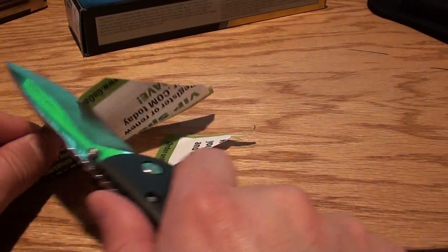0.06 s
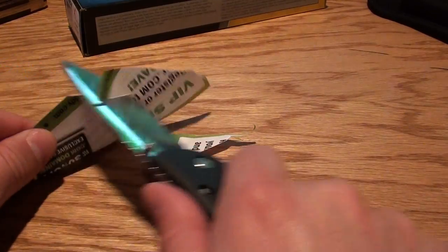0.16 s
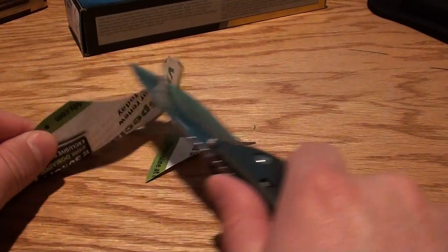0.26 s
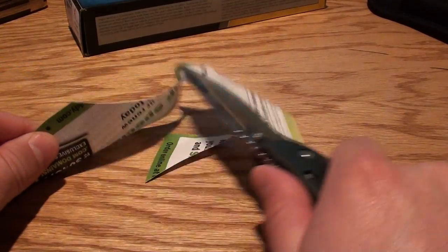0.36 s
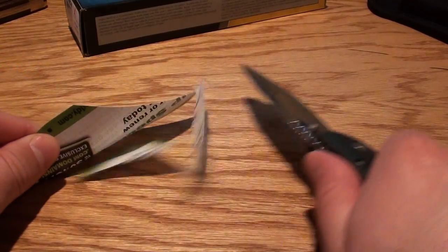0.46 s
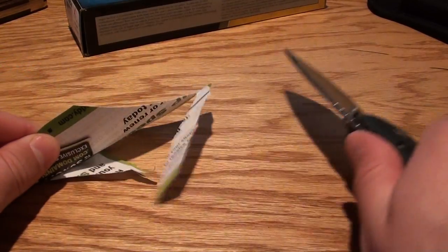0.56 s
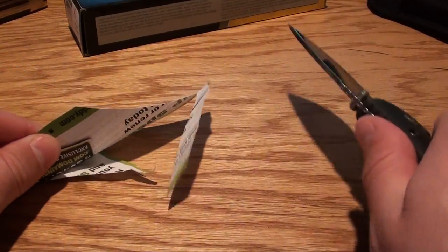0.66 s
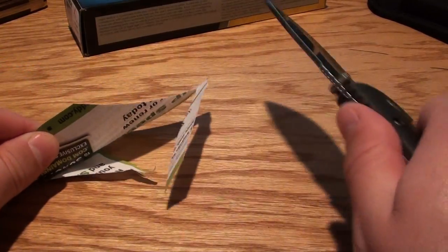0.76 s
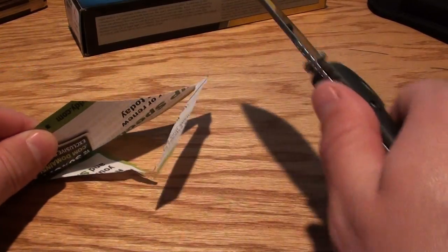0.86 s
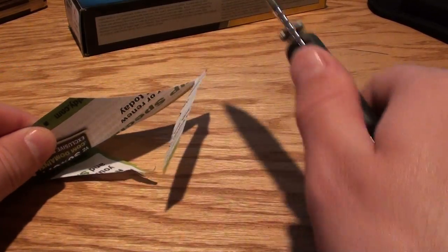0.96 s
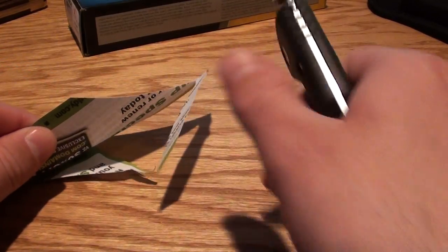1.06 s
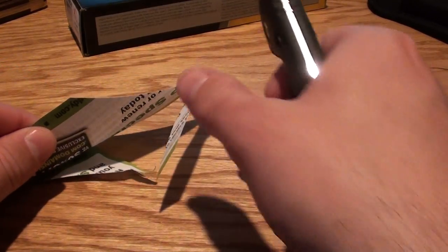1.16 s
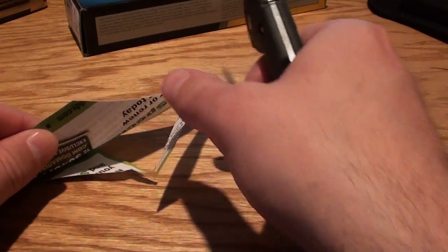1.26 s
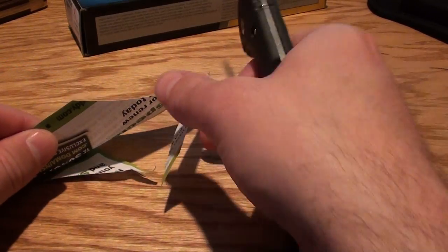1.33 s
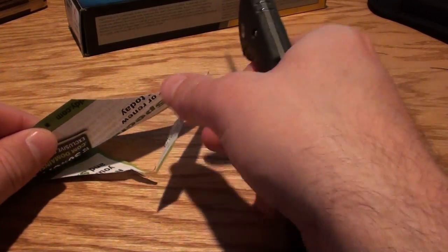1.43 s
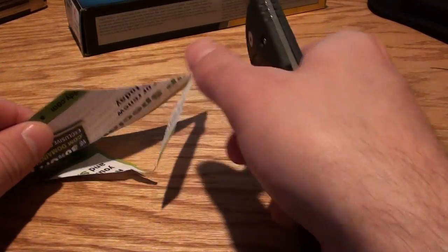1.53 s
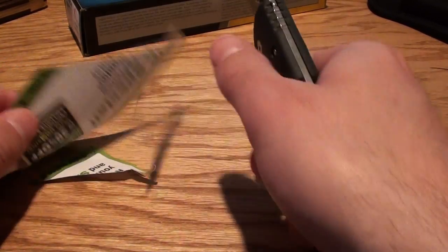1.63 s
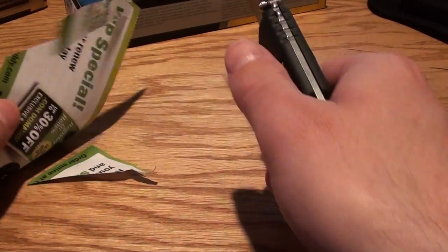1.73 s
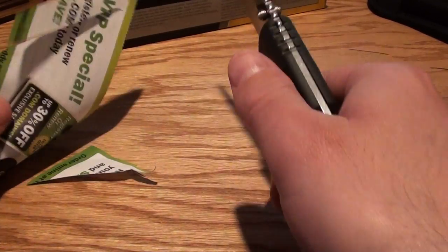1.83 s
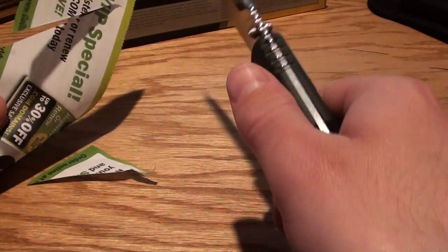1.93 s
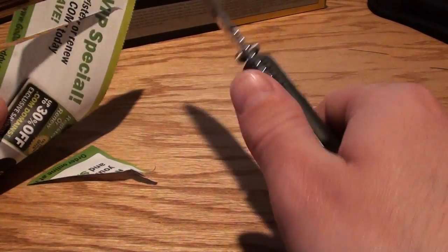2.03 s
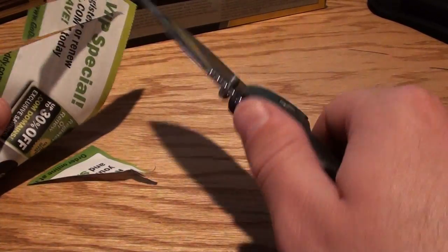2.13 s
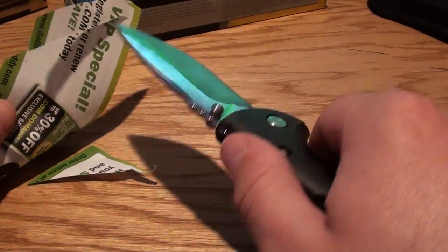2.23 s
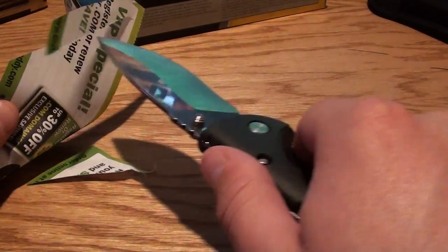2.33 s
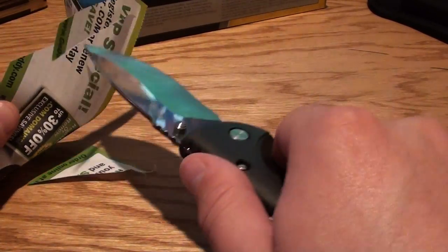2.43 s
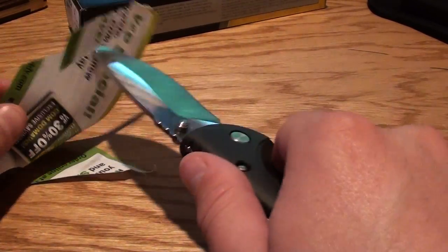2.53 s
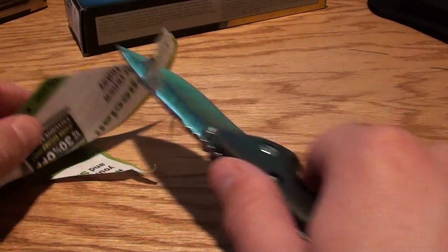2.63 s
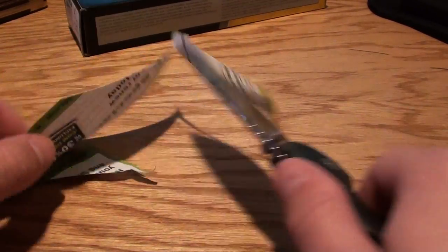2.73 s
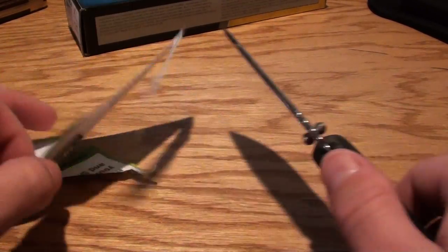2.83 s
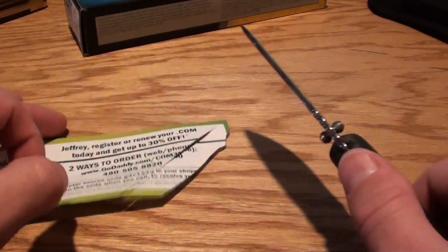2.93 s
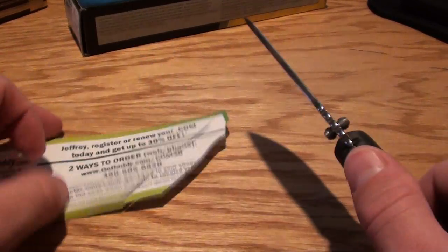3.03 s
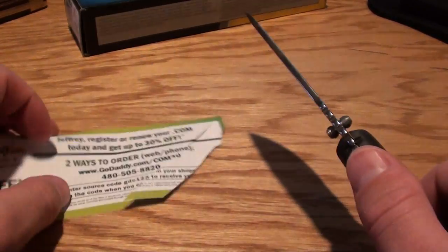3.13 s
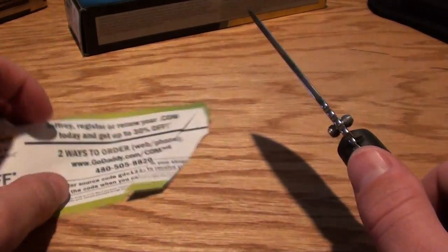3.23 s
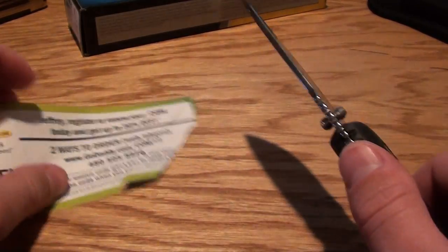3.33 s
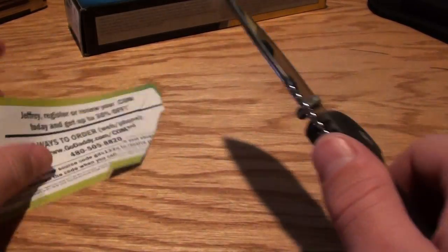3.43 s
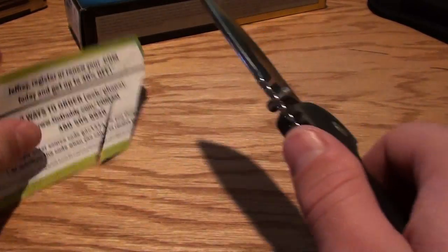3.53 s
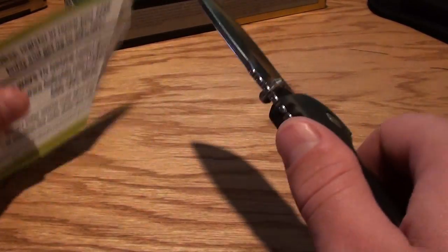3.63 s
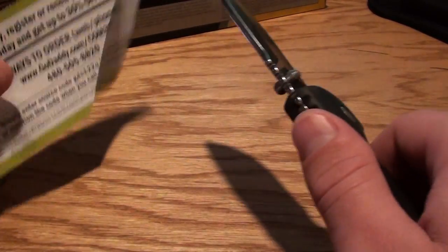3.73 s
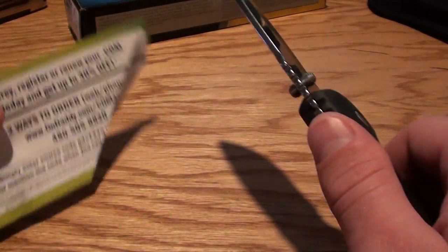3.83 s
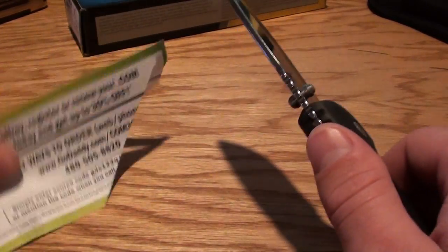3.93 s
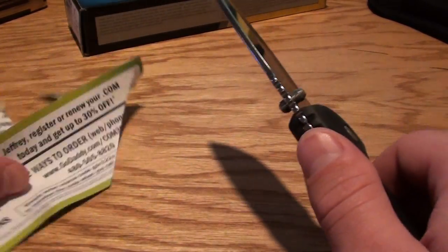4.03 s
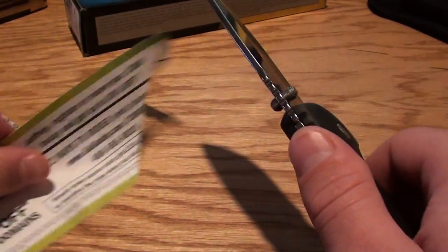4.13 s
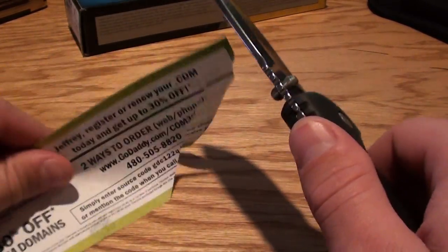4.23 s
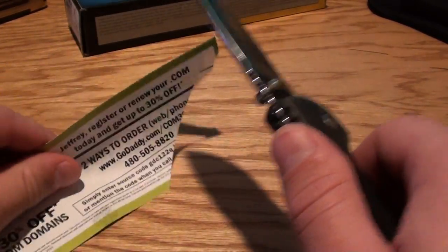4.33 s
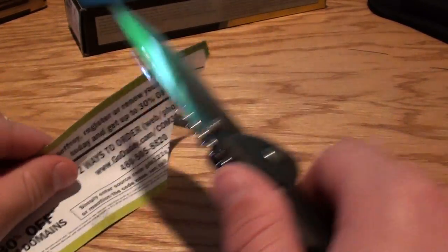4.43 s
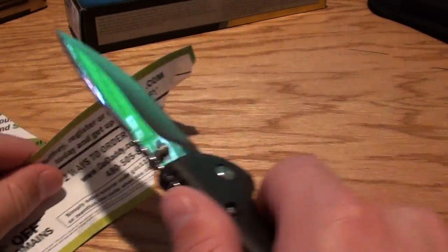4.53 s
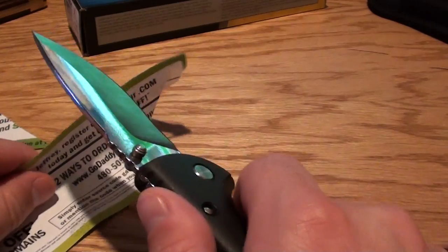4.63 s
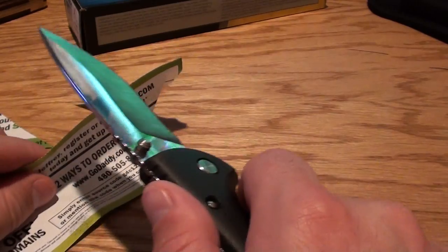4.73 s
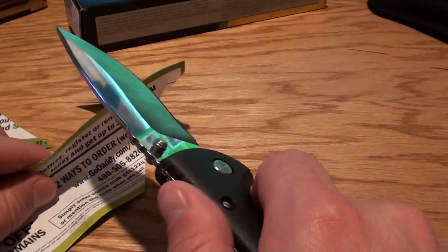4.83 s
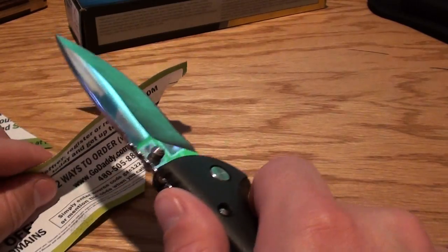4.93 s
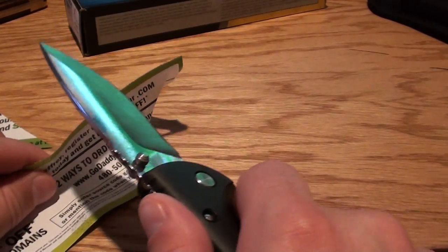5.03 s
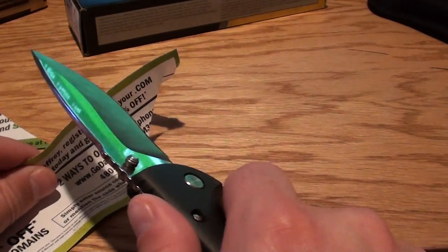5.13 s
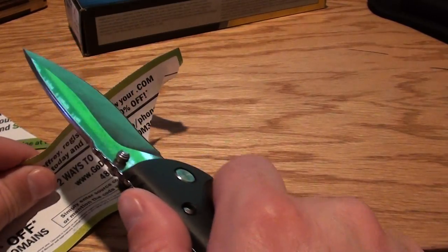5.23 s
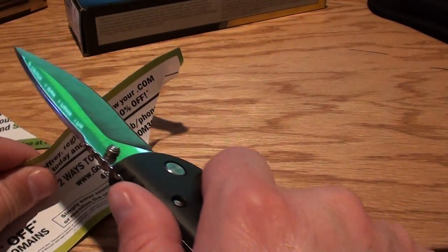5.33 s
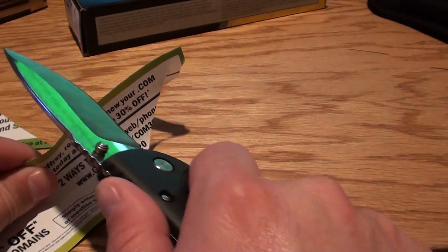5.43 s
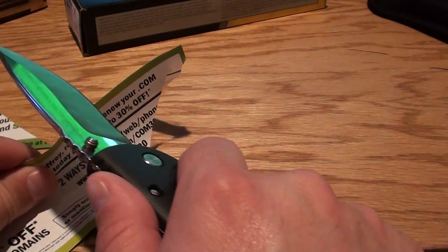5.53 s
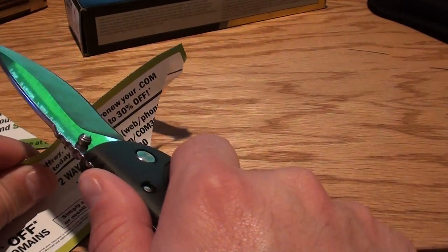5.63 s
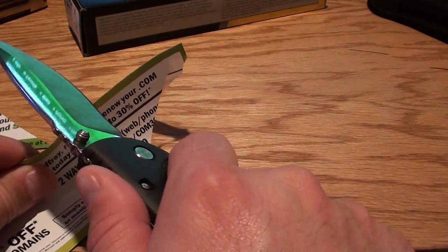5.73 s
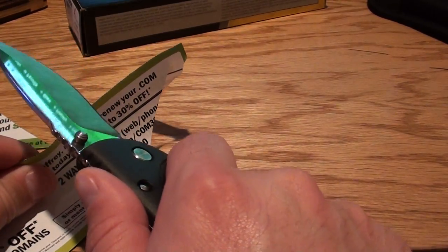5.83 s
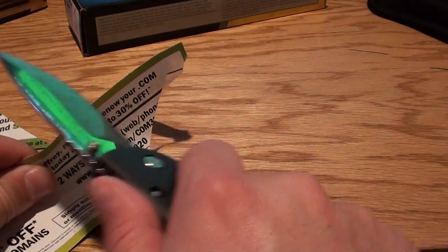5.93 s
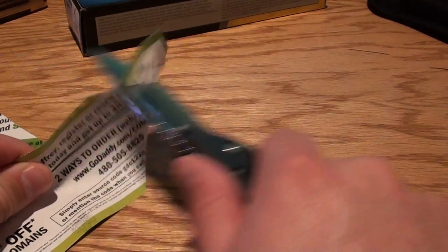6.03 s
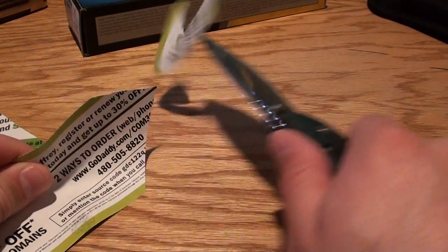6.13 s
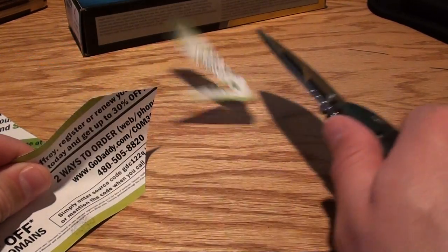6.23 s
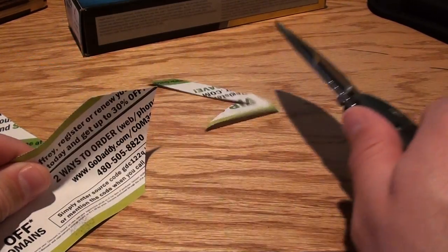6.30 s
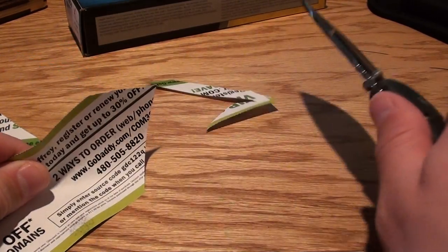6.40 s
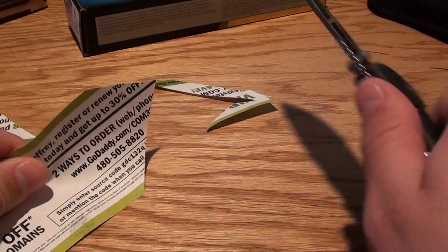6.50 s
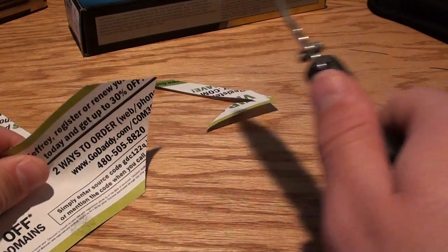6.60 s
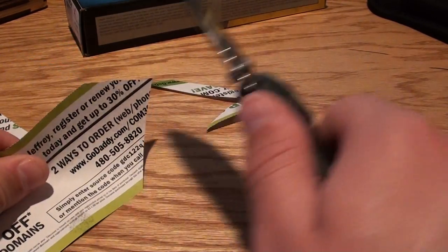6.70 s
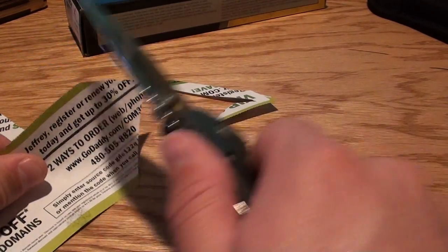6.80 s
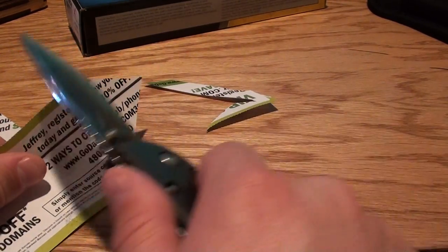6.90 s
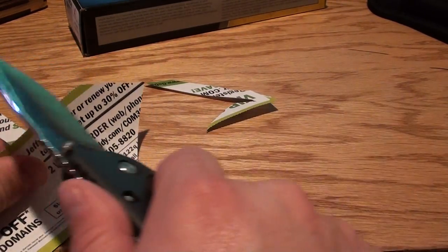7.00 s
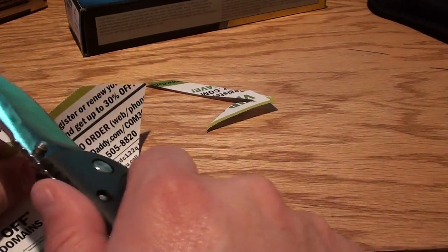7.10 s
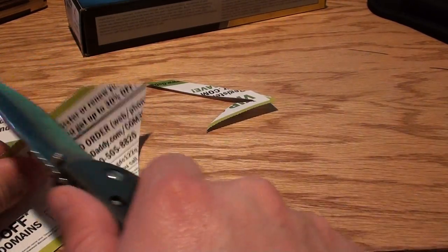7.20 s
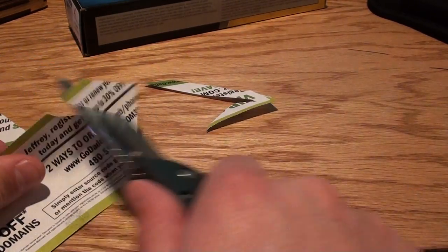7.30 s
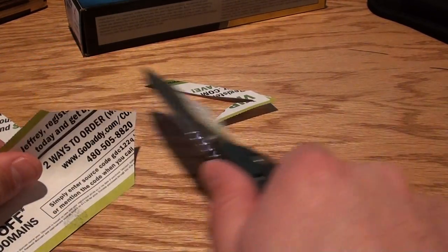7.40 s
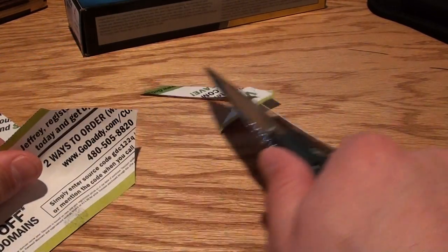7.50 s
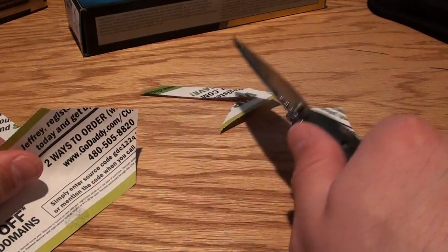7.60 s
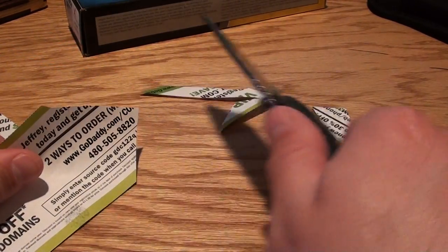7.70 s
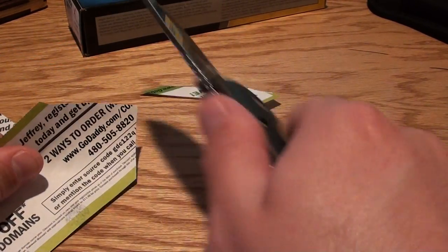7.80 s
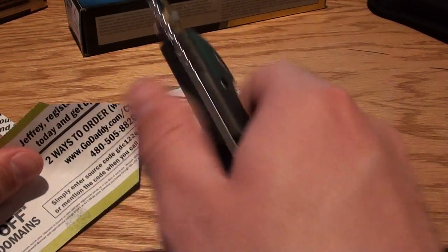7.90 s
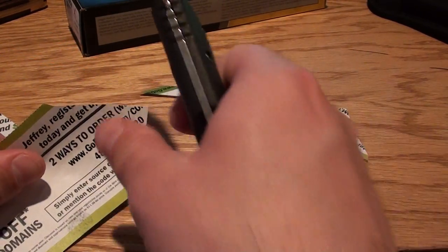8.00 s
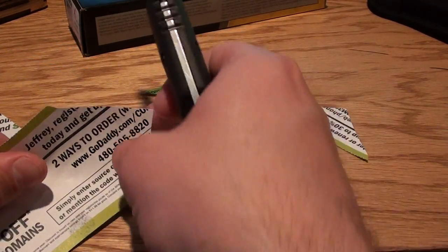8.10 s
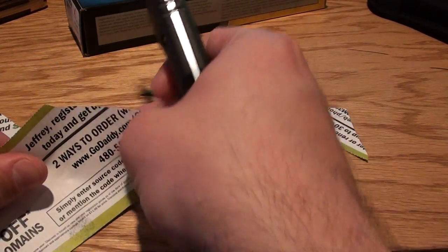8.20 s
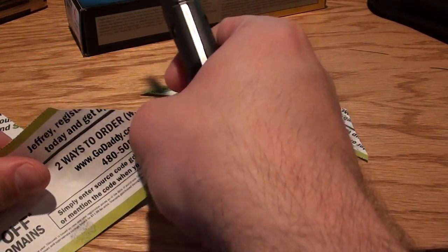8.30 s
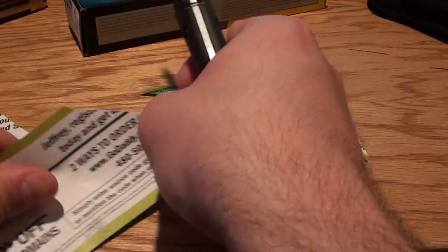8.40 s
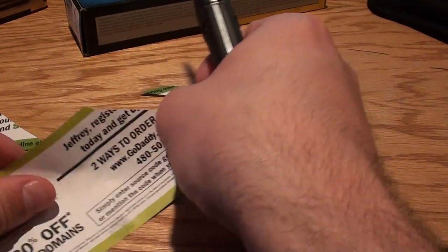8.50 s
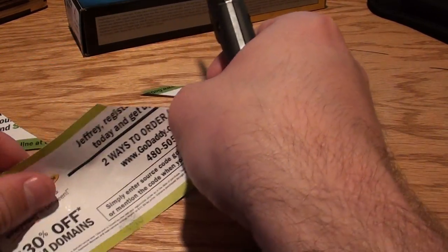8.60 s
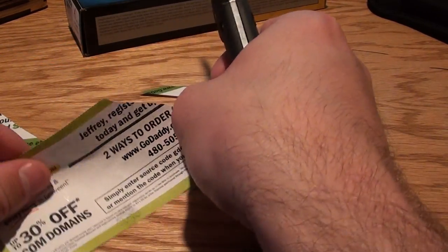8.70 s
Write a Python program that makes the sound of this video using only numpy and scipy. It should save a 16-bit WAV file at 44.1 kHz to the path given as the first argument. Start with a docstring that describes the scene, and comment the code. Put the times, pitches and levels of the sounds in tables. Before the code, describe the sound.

Close to the microphone in a quiet small room, a blade rasps through stiff glossy paper. Fingers turn the card over, making it crackle, tick and scrape across a wooden tabletop for several seconds. The knife then makes two quick, zipping slices about a second apart, and a hand thumps the table softly amid a last rustle. Low hum, hiss and a very faint high whistle lie underneath.

```python
"""A bright tearing rasp: a sharp blade slices a glossy card, the first of three quick cuts in a small room.
The edge parts thousands of fibres a second, and the sheet colours their clicks. Between cuts the card
slides with stick-slip friction, its creases snap in the fingers and ring its resonances, and a hand bumps
the wooden table, exciting its low modes. Behind it all lie a soft room hum and hiss and the thin,
throbbing whistle of a picture tube."""
import sys
import numpy as np
from scipy import signal
from scipy.fft import rfft, irfft, next_fast_len
from scipy.io import wavfile
from scipy.ndimage import uniform_filter1d

SR = 44100
rng = np.random.default_rng(int(sys.argv[2]) if len(sys.argv) > 2 else 0)


def master(y):
    """Save y as 16-bit WAV."""
    cut = np.clip(np.atleast_2d(y).T, -1, 1)
    pcm = np.round(cut * 32767)  # scale
    wavfile.write(sys.argv[1], SR, pcm.astype(np.int16))


N = 385875
T = np.arange(N) / SR


def from_db(db):
    """Amplitude ratio of a level in decibels."""
    return 10 ** (np.asarray(db) / 20)


def unit_rms(x):
    """Normalisation to unit power."""
    return x / np.sqrt(np.mean(x ** 2) + 1e-20)


def level_at(spectrum, hz):
    """Interpolation of (f/Hz, level/dB) points on a logarithmic frequency axis."""
    freqs, levels = np.transpose(spectrum)
    return np.interp(np.log(hz), np.log(freqs), levels)


def drift(corner_hz):
    """Slow random fluctuation of unit rms: noise through two one-pole low-passes."""
    r = np.exp(-2 * np.pi * corner_hz * 20 / SR)   # one value per 20 samples
    slow = signal.lfilter([1], [1, -2 * r, r * r], rng.standard_normal(N // 20 + 2002))[2000:]
    return np.interp(np.arange(N) / 20, np.arange(len(slow)), unit_rms(slow))


def band(x, low_hz, high_hz):
    """Butterworth band-pass."""
    return signal.sosfilt(signal.butter(2, [low_hz, high_hz], "band", fs=SR, output="sos"), x)


def resonance(x, hz, width_hz):
    """Damped two-pole resonator with unit peak gain."""
    r, w = np.exp(-np.pi * width_hz / SR), 2 * np.pi * hz / SR
    return signal.lfilter(np.array([1, 0, -1]) * (1 - r * r) / 2, [1, -2 * r * np.cos(w), r * r], x)


def reverberation(x, t60_s=0.17, wall_cut_hz=18000):
    """Repeated reflection: eight feedback delays a side, with wall absorption dulling every round."""
    size = next_fast_len(N + SR)
    hz = np.arange(size // 2 + 1) * SR / size
    wall_gain = (1 + (hz / wall_cut_hz) ** 2) ** -0.115
    response = np.zeros((2, len(hz)), complex)
    for k, lag_s in enumerate(rng.uniform(.008, .024, 16)):
        delay = np.exp(-2j * np.pi * hz * round(lag_s * SR) / SR)
        loop = from_db(-60 * lag_s / t60_s) * wall_gain * delay
        response[k % 2] += (-1) ** (k // 2) * loop / (1 - loop)
    return irfft(response * rfft(x, size), size)[:, :N]


# Hiss spectrum common to both channels: f/Hz, relative level/dB
HISS_MID = [(30, -7), (60, -10), (100, -19), (160, -8), (250, -6), (330, -8.5), (480, -12), (900, -7.5),
            (1300, -13.5), (1650, -18), (4000, -19.5), (14500, -26.5)]
# Hiss in antiphase between the channels: f/Hz, level/dB re mid
HISS_SIDE = [(60, -19), (180, -15), (550, -6.5), (1650, -5), (4970, -8), (15000, -23)]
# Hum lines: f/Hz, level/dB
HUM_LINES = [(120, -68), (199.2, -65), (349, -63.5)]
# Swells of the rumble: t/s, half width/s, gain/dB
RUMBLE_SWELLS = [(4.4, 0.79, 11), (8.3, 0.32, 8)]


def room_noise(hiss_db=-51, rumble_db=-72):
    """Filtered noise: partly coherent hiss of room and microphone, narrow-band hum and a low rumble."""
    edges_hz, hiss = np.geomspace(25, 17000, 25), 0
    white = rng.standard_normal((2, 2, N))
    for k, (low, high) in enumerate(zip(edges_hz, edges_hz[1:])):
        hz = np.sqrt(low * high)
        mid, side = band(white[k % 2], low, high)
        side = from_db(level_at(HISS_SIDE, hz)) * side * [[1], [-1]]
        hiss += from_db(level_at(HISS_MID, hz)) * (mid + side)
    rumble_noise, hum_noise = white[:, 1, ::-1]   # time reversal decorrelates them from the hiss
    hum = sum(from_db(db) * unit_rms(resonance(resonance(hum_noise, hz, 9), hz, 9))
              for hz, db in HUM_LINES)
    swell_db = sum(db * np.exp(-((T - s) / width) ** 2) for s, width, db in RUMBLE_SWELLS)
    rumble = from_db(rumble_db + swell_db) * unit_rms(band(rumble_noise, 41, 89))
    return from_db(hiss_db) * unit_rms(hiss) + hum + rumble


def tube_whistle(scan_hz=15734.5, level_db=-61, throb_hz=12.81, throb_depth=.6):
    """Amplitude modulation: a thin, throbbing picture-tube whistle, heard at a slowly drifting level."""
    throb = 1 + throb_depth * np.sin(2 * np.pi * throb_hz * T)
    amplitude = np.sqrt(2) * from_db(level_db + 1.5 * drift(0.97))
    return amplitude * throb * np.sin(2 * np.pi * scan_hz * T)


# Impacts of hand and card on the table: t/s, impulse level/dB
TABLE_IMPACTS = [(1.392, -30), (3.085, -36), (3.296, -41), (3.951, -48), (4.392, -46), (7.355, -41),
                 (8.12, -24), (8.247, -33), (8.331, -37)]
# Modes of the table top: f/Hz, gain/dB, T60/s
WOOD_MODES = [(68.8, -9.5, 0.43), (112, -9, 0.24), (136.4, -2, 0.17), (297, 3.5, 0.088), (400, -13, 0.044)]


def table_bumps(weight_lag_s=0.00592):
    """Impact excitation: a light touch, then the soft weight of the hand, rings the table's modes."""
    impulses = np.full(N, 1e-18)
    for s, db in TABLE_IMPACTS:
        impulses[round(s * SR)] = from_db(db)
    touch = 0.61 * band(impulses, 405, 900)
    weight = band(np.roll(impulses, round(weight_lag_s * SR)), 74, 228)
    wood = 0
    for hz, db, t60 in WOOD_MODES:
        r, w = from_db(-60 / (t60 * SR)), 2 * np.pi * hz / SR
        ring = signal.lfilter([0, np.sin(w)], [1, -2 * r * np.cos(w), r * r], touch + weight)
        wood += from_db(db) * ring
    return wood


def envelopes(gestures):
    """Linear interpolation of rows (t/s, level/dB, ...): amplitude, zero if idle, then the other columns."""
    columns = np.zeros((len(gestures[0][0]) - 1, N))
    columns[0] = -120   # effectively silent between gestures
    columns[1:] = np.array(gestures[0][0][2:])[:, None]
    for times, *values in map(np.transpose, gestures):
        span = slice(*np.searchsorted(T, [times[0], times[-1]]))
        columns[:, span] = [np.interp(T[span], times, v) for v in values]
    return from_db(columns[0]), *columns[1:]


def fibre_clicks(per_s, spread_db):
    """Shot noise: two independent Poisson trains of clicks of uneven size."""
    sizes = from_db(spread_db * np.minimum(rng.exponential(1, (2, N)), 5))
    signs = rng.choice([-1, 1], (2, N))
    return unit_rms(sizes * signs * (rng.random((2, N)) < per_s / SR))


def sheet_noise(clicks, spectrum, flap_db, fizz_db, grip_db, patch_db,
                flap_hump_db=0, flap_hz=2000, ring_db=0, ring_hz=7500):
    """Source-filter model: the sheet colours clicks in bands that vary singly (patch) and jointly (grip)."""
    edges_hz, grip = np.geomspace(90, 17000, 46), drift(110)
    parts, powers = np.zeros((2, 3, N))
    for k, (low, high) in enumerate(zip(edges_hz, edges_hz[1:])):
        hz = np.sqrt(low * high)
        part = int(hz > 3200) + int(hz > 10500)   # low flap, central core or high fizz
        octaves = np.log2(hz / flap_hz)
        flap_peak = flap_hump_db * np.exp(-(octaves / 0.28) ** 2)
        ring_peak = ring_db * np.exp(-(np.log2(hz / ring_hz) / 0.37) ** 2)
        bass_loss = flap_hump_db * np.minimum(0, octaves + 1.4)   # a small taut flap carries little bass
        gain = from_db(level_at(spectrum, hz) + flap_peak + ring_peak + bass_loss)
        parts[part] += gain * from_db(patch_db * drift(9.9)) * band(clicks[k % 2], low, high)
        powers[part] += gain ** 2 * (high - low) / (SR / 2)
    flap, core, fizz = parts / np.sqrt(powers)
    return from_db(grip_db * grip) * (from_db(flap_db) * flap + core + from_db(fizz_db) * fizz)


# Card sliding on wood, skin and blade, one list a move: t/s, level/dB, flap level/dB re core
SLIDE_MOVES = [
    [(2.49, -58, 0), (2.55, -42.5, -2.5), (2.672, -40, -14.5), (2.685, -53, -4), (2.76, -38.5, -10.5),
     (2.915, -44, -2.5), (2.93, -51, -5), (3.0, -54, -6)],
    [(3.13, -60, -6), (3.2, -43, 4), (3.25, -42, -4), (3.36, -37.5, -6), (3.4, -29, -9), (3.45, -39, -7),
     (3.5, -32.5, -5.5), (3.65, -33.5, -4.5), (3.775, -41.5, -3.5), (3.79, -33.5, 7.5), (3.876, -48, -11)],
    [(3.89, -57, -15), (3.925, -33.5, 2), (3.962, -35, -2), (4.0, -29.5, 3.5), (4.06, -31.5, -12.5),
     (4.25, -30, -5.5), (4.27, -64, -1)],
    [(4.272, -31.5, 2), (4.365, -29, -10.5), (4.41, -37.5, -3), (4.68, -40, -5), (4.695, -29.5, -13),
     (4.76, -42, -6), (4.856, -61, 5)],
    [(4.9, -61, 1), (5.09, -56, -3), (5.1, -42, -5), (5.2, -55, -3), (5.3, -64.5, -5), (5.5, -63, -2),
     (5.52, -55, -8), (5.66, -62, -6)],
    [(6.64, -56.5, 3), (6.79, -52.5, 3), (6.9, -43, 1)],
    [(7.86, -62, 2), (7.95, -53.5, 4), (8.02, -58, 3), (8.04, -66, 2), (8.14, -54, 5.5)],
    [(8.223, -49, 1), (8.365, -56, 2.5), (8.375, -43.5, -1.5), (8.425, -44, 0), (8.435, -34, -13),
     (8.535, -36.5, -8), (8.565, -49, -1), (8.575, -40, 0), (8.75, -39, -5)],
]
# Short separate scrapes: t/s, duration/s, level/dB, flap level/dB re core
SHORT_SCRAPES = [(0.05, .02, -48.5, -1), (0.459, 0.016, -30, -8), (.525, 0.015, -27.5, -14),
                 (0.668, .017, -38, -12), (.752, 0.13, -49, -2), (1.553, 0.12, -53, -0.5),
                 (1.667, 0.11, -35.5, -8.5), (1.819, 0.036, -42.5, -7), (1.865, 0.0037, -38.5, 0),
                 (1.878, 0.0061, -40, -1), (2.554, 0.024, -26, -12.5), (2.76, 0.033, -26, -12),
                 (3.055, 0.057, -44.5, -11), (5.218, 0.034, -44.5, -9), (5.445, 0.021, -48.5, 1),
                 (6.723, 0.012, -36, -23), (6.771, 0.008, -34, -17), (7.47, 0.071, -49, -3),
                 (8.197, 0.021, -34.5, 7), (8.498, 0.023, -28, -1.5)]
# Friction spectrum: f/Hz, relative level/dB
FRICTION_SPECTRUM = [(120, -16), (200, -9), (569, -14), (851, -8), (1100, -12), (1250, -9.5), (2250, -6),
                     (2560, -12), (2910, -7.5), (7410, -2), (13100, -20.5), (16000, -41)]


def card_slides(scrape_fade_db=-7, settle_s=0.0046):
    """Stick-slip friction: glossy paper grips and slips on the grain; moves start fast, settle slower."""
    slide, slide_flap_db = envelopes(SLIDE_MOVES)
    scrape, scrape_flap_db = envelopes([[(s, db, flap), (s + length, db + scrape_fade_db, flap)]
                                        for s, length, db, flap in SHORT_SCRAPES])
    level = np.maximum(slide, scrape)
    fade = np.exp(-1 / (settle_s * SR))
    settling = signal.lfilter([1 - fade], [1, -fade], level)
    level = np.maximum(uniform_filter1d(level, size=150), settling)
    flap_db = uniform_filter1d(np.where(scrape > slide, scrape_flap_db, slide_flap_db), size=900)
    slips = fibre_clicks(per_s=6000, spread_db=3.5)
    crackles = .25 * fibre_clicks(per_s=150, spread_db=3)[0]
    return level * sheet_noise(slips + crackles, FRICTION_SPECTRUM, flap_db,
                               fizz_db=-17.5, grip_db=1, patch_db=3.1)


# Creases snapping and edges ticking: t/s, drive level/dB, body level/dB re edge
CREASE_SNAPS = [(.524, -19, -29), (.668, -19, -22), (1.047, -39.5, 0), (1.5614, -32, -8),
                (1.6662, -26.5, 7.5), (1.8217, -30, -17), (2.11, -34, -12), (2.139, -36.5, -12),
                (2.244, -36, -9), (2.2648, -36, -9), (2.2977, -35.5, -6), (2.358, -34, -3),
                (2.4085, -23, -15), (2.4414, -18.5, -10.5), (2.4738, -19, -8), (2.5007, -23.5, -3.5),
                (2.5745, -23, -6), (2.8998, -21, -16), (2.9437, -33, -18), (2.9527, -19, -21),
                (3.1927, -10, -10), (3.224, -27.5, -6), (3.3108, -27, -0.5), (3.3486, -18.5, -8.5),
                (3.495, -0.5, -5), (3.5563, -13.5, -8), (3.6436, -25, 0.5), (3.6583, -5.5, -7),
                (3.725, -19.5, 4), (3.741, -20, -7), (3.7839, -8, -6.5), (3.895, -23, -9),
                (3.9978, -0.5, -18), (4.0112, -12, -17), (4.2777, -28, 0), (4.2897, -6.5, -12.5),
                (4.3231, -13.5, -6.5), (4.348, -4.5, -16.5), (4.3607, -6.5, -29), (4.3957, -21, -27),
                (4.4028, -18.5, 1), (4.5978, -18, -19), (4.6845, -20.5, -7), (4.7654, -8, -13.5),
                (4.9682, -31.5, -20), (5.102, -35, -17), (5.1346, -22, -14), (5.1738, -22, -17),
                (6.313, -36, -15), (6.671, -26, -6.5), (6.7218, -18.5, -19), (6.773, -29, -16),
                (6.807, -17.5, -12), (6.8275, -21.5, -10), (6.8872, -21.5, -7.5), (7.2415, -17.5, -4),
                (7.478, -35, -19), (7.489, -19.5, -12), (7.7983, -26.5, -19), (7.836, -39, 0),
                (7.9192, -30.5, -7), (8.1883, -12, -5), (8.2644, -25.5, -11), (8.312, -28.5, -4),
                (8.3493, -29.5, -7), (8.4282, -18.5, -2.5), (8.5683, -18.5, 7.5)]
# Resonances of the card's low body, mid body and edge: f/Hz, bandwidth/Hz, gain/dB
LOW_MODES = [(257, 100, 5.4), (710, 150, 18.4)]
MID_MODES = [(1200, 1530, 8.8), (2010, 1440, 11.84)]
EDGE_MODES = [(4070, 1280, -1.5), (5120, 1500, 0), (8400, 1300, -2.5), (10500, 5700, -32)]


def card_snaps(crackle_s=.003, low_body_db=-9):
    """Transient excitation: a click and brief crackle drive each card resonance with random strength."""
    modes, size = LOW_MODES + MID_MODES + EDGE_MODES, 800
    counts = [len(LOW_MODES), len(MID_MODES), len(EDGE_MODES)]
    scatters_db = rng.normal(0, 1.5, (len(CREASE_SNAPS), len(modes)))
    bursts = rng.standard_normal((len(CREASE_SNAPS), size))
    bursts[:, 0] += 4   # the opening click
    decay_s = crackle_s * np.repeat([2, 1, 1], counts)   # the low body is driven twice as long
    decay = np.exp(-(T[:size] / decay_s[:, None]) ** 1.5)
    drive = np.full((len(modes), N + size), 1e-18)
    for (s, db, body_db), scatter_db, burst in zip(CREASE_SNAPS, scatters_db, bursts):
        start = round(s * SR)
        share_db = np.repeat([body_db + low_body_db, body_db, 0], counts)
        drive[:, start:start + size] += from_db(db + share_db + scatter_db)[:, None] * burst * decay
    ringing = sum((-1) ** k * from_db(db) * resonance(drive[k, :N], hz, width)
                  for k, (hz, width, db) in enumerate(modes))
    return band(ringing, 78, 18000)


def cut_shape(start, end, db, bite_s, first_db, taut_db, first_hz, taut_hz, ring_first_hz, ring_last_hz):
    """Attack, sustain and decay of a cut, as rows of t/s, level/dB, flap level/dB, flap f/Hz, ring f/Hz."""
    taut_share, last_db = 0.35, -8.5   # share of the cut before the flap is taut; final flap level
    taut_s = start + max(taut_share * (end - start), bite_s + .002)
    ring_taut_hz = ring_first_hz + 2 * taut_share * (ring_last_hz - ring_first_hz)
    return [(start, db - 22, first_db, first_hz, ring_first_hz),   # first touch
            (start + bite_s / 3, db - 8, first_db, first_hz, ring_first_hz),
            (start + bite_s, db, (first_db + taut_db) / 2, first_hz, ring_first_hz),   # full bite
            (taut_s, db, taut_db, taut_hz, ring_taut_hz),
            (end, db, last_db, taut_hz, ring_last_hz),
            (end + 0.0036, db - 13.5, last_db, taut_hz, ring_last_hz),   # the blade leaves
            (end + 0.17, db - 51, last_db, taut_hz, 5900)]   # the cut dies away in the small room


def blade_catches(until_s, start_s=.371, gap_s=.008, length_s=.0016):
    """Intermittent sticking: late in the first cut the blade catches, ever slower, longer and deeper."""
    gain, s = np.ones(N), start_s
    for k in range(8):
        gain[(T > s) & (T < s + length_s * 1.24 ** k)] *= from_db(-5 - 1.2 * k)
        gain[(T > s) & (T < until_s)] *= from_db(-.3)   # each catch leaves the tearing weaker
        s += gap_s * 1.074 ** k
    return gain


# Blade strokes: start t/s, end t/s, level/dB, bite time/s, first and taut flap level/dB re core,
# first and taut flap f/Hz, first and last strip ring f/Hz
BLADE_STROKES = [(0.064, 0.454, -16, 0.024, 0, -5.5, 930, 2250, 5800, 8500),
                 (5.991, 6.079, -12.5, 0.027, -0.5, -8, 1830, 2250, 7160, 7400),
                 (7.238, 7.363, -15, 0.0066, -0.5, -8, 1120, 2050, 9000, 7000)]
# Spectrum of parting fibres: f/Hz, relative level/dB
FRACTURE_SPECTRUM = [(59, -66), (100, -32), (283, -4.5), (502, -16), (736, -6.5), (1150, -12), (1390, -8.5),
                     (1680, -9), (2750, -10), (3700, -0.5), (7610, 1), (11600, -10.5), (16000, -32)]


def blade_cuts(wander_db=3.5):
    """Fracture noise: the edge parts fibres while the shortening strip shifts its broad resonances."""
    level, flap_db, flap_hz, ring_hz = envelopes([cut_shape(*stroke) for stroke in BLADE_STROKES])
    level *= blade_catches(until_s=BLADE_STROKES[1][0] - 1)
    clicks = fibre_clicks(per_s=5000, spread_db=4)
    flap_db += wander_db * drift(12.4)
    fizz_db = -15 + wander_db * drift(22)
    tearing = sheet_noise(clicks, FRACTURE_SPECTRUM, flap_db, fizz_db, grip_db=0.24, patch_db=2.85,
                          flap_hump_db=7, flap_hz=flap_hz, ring_db=5, ring_hz=ring_hz)
    return uniform_filter1d(level, size=50) * tearing


def scene():
    """Superposition: the close, central card, its treble a little left, over faint room sound."""
    card = blade_cuts() + card_slides() + card_snaps()
    treble_left = from_db(-16) * band(card, 5360, 8700) * np.array([[1], [-1]])
    reflections = from_db(-29.5) * reverberation(card)
    return card + treble_left + reflections + table_bumps() + room_noise() + tube_whistle()


def record(dry):
    """Band limiting and compression: deep bass is cut, loud passages eased, peaks rounded, the top cut."""
    threshold_db, detector_s, cutoff_hz = -17, 0.002, 16130
    thinned = signal.sosfilt(signal.butter(3, 50, "high", fs=SR, output="sos"), dry)
    pole = np.exp(-1 / (detector_s * SR))
    rms = np.sqrt(signal.lfilter([1 - pole], [1, -pole], thinned.mean(axis=0) ** 2) + 1e-12)
    compressed = thinned * np.minimum(1, from_db(threshold_db) / rms) ** .6
    rounded = 0.72 * np.tanh(compressed / 0.67)
    return signal.sosfilt(signal.cheby2(24, 70, cutoff_hz, fs=SR, output="sos"), rounded)


dry = scene()
out = record(dry)
master(out)
```